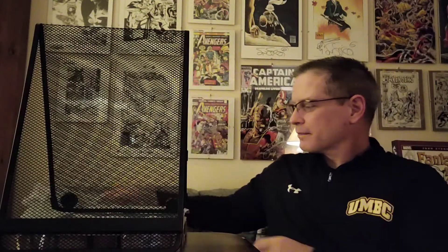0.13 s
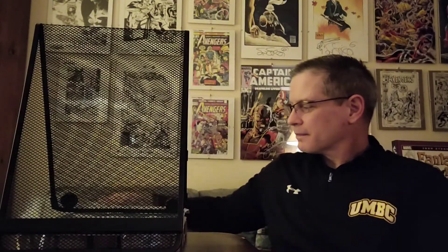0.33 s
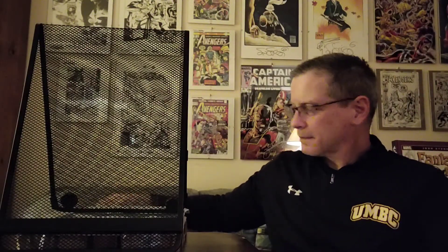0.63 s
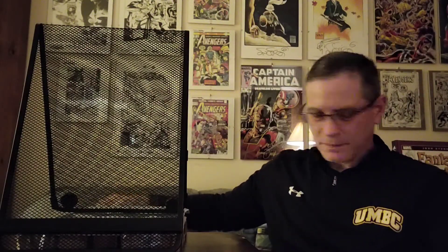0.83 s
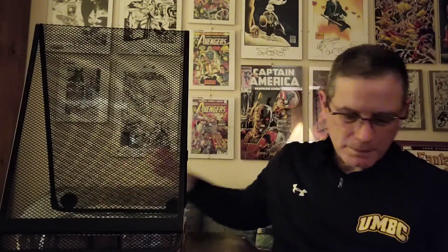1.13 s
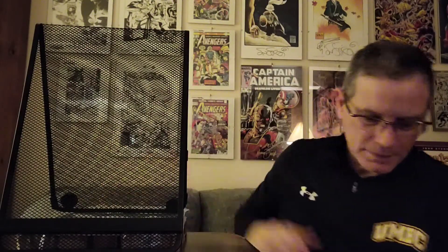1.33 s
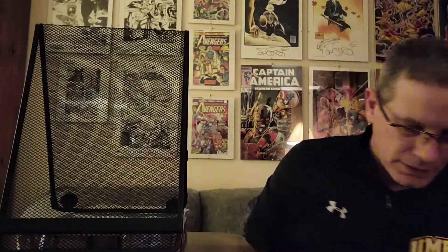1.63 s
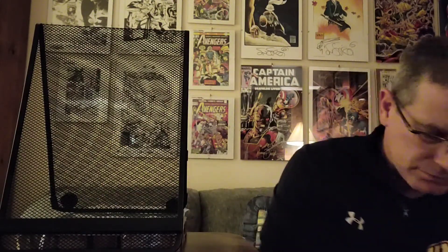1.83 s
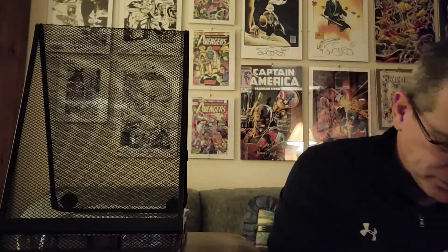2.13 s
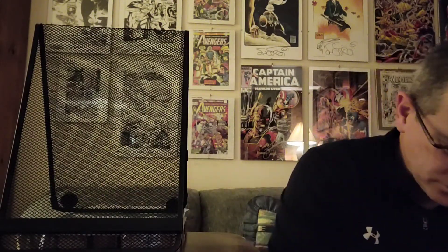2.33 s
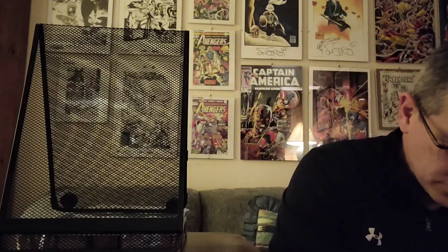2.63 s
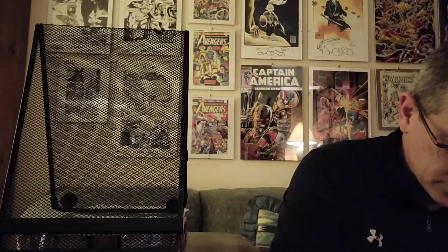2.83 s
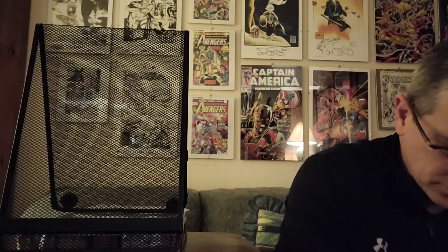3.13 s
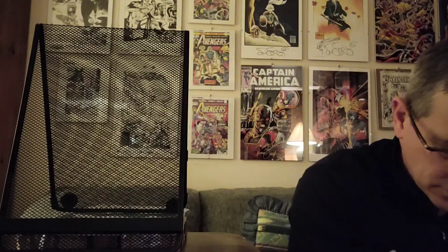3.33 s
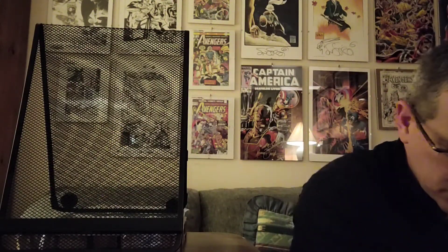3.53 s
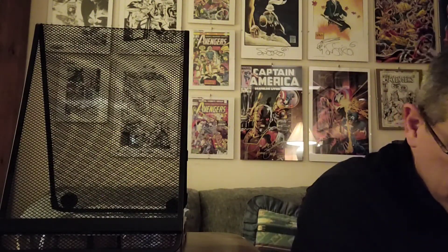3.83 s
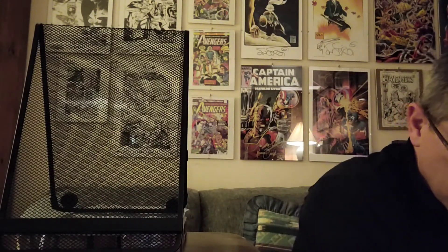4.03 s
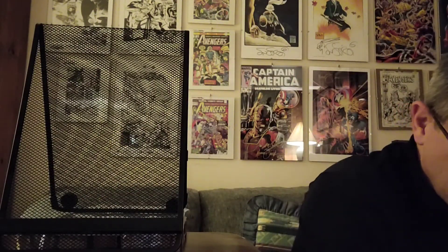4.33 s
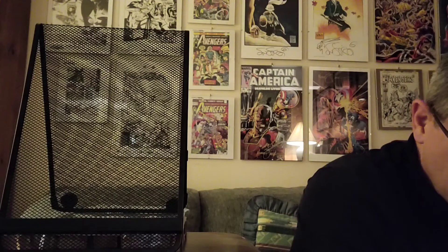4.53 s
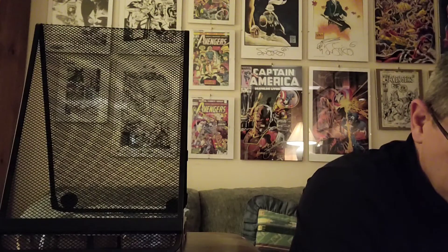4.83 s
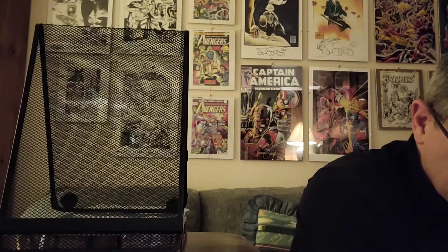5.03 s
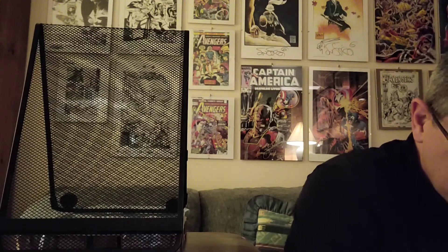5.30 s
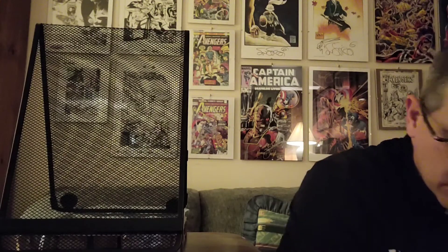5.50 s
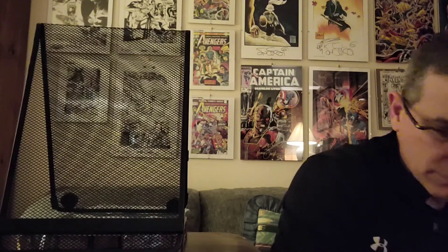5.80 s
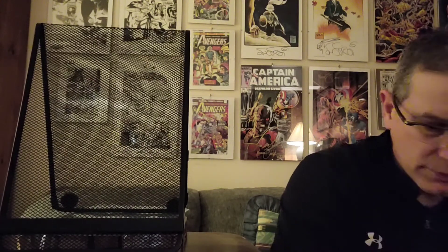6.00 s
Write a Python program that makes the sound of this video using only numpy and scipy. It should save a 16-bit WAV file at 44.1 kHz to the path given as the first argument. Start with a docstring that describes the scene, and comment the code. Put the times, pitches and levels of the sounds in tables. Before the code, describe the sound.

Faint taps and plastic clacks, dry crinkling and rummaging in wrap with dull box thumps, ending in a loud knocking scrape and two clacks.

```python
"""Faint dull taps lead to a few clacks, bursts of contacts, as someone sets a hard plastic case down.
A hand then digs in packing for the next: random slips hiss and crinkle, creases snap as short ticks.
Struck modes give knocks, edge clicks and thumps of the box; then a case scrapes loudly on its way out
and clacks twice. Filtered noise and a thin whine lie beneath, in a small furnished room, almost mono."""
import sys
import numpy as np
from scipy import signal
from scipy.fft import rfft, irfft
from scipy.io import wavfile
from scipy.ndimage import uniform_filter1d

SR = 44100
rng = np.random.default_rng(int(sys.argv[2]) if len(sys.argv) > 2 else 0)


def wav_record(signal):
    """Record a signal, one row per channel, as 16-bit PCM in the file named by sys.argv[1]."""
    frames = np.transpose(np.atleast_2d(signal))
    bounded = np.clip(frames, -1, 1)
    # unit amplitude maps onto the largest positive 16-bit level
    quanta = np.round(bounded * 32767).astype(np.int16)
    wavfile.write(sys.argv[1], SR, quanta)


N = 271656
TIME = np.arange(N) / SR

# spectrum of the quiet room: (frequency [Hz], relative density [dB per Hz])
AIR_COLOUR = [(25, -10.5), (60, 1.5), (200, -0.5), (600, -7), (900, -7), (1600, -13), (3000, -18),
              (6000, -13), (9000, -20.5), (16000, -25)]
# pitch of a faint electrical whine: (time [s], frequency [Hz])
WHINE_PITCH = [(0, 5570), (1, 5570), (2, 5570), (6.2, 5700)]
# decay of the room: (frequency [Hz], t60 [s])
ROOM_DECAY = [(100, 0.46), (600, 0.22), (3000, 0.25), (8000, 0.25), (15000, 0.16)]
# faint dull taps at a steady pace before the case is set down: (time [s], level [dB])
FAINT_TAPS = [(.055, -71), (.145, -73), (.235, -71), (.325, -72), (.412, -70)]
# a case clacks on its support:
# (time [s], level [dB], length of the chatter [s], treble tilt [dB per octave])
CASE_CLACKS = [(0.461, -46, 0.04, -2.5), (0.6857, -27, 0.038, 0), (0.9741, -30.5, 0.047, -0.5),
               (6.007, -28, 0.0046, -0.5), (6.049, -34, 0.0055, 0.5)]
# spectrum of a clack before its tilt: (frequency [Hz], relative density [dB per Hz])
CLACK_SPECTRUM = [(59, -27), (100, -26), (279, -21), (375, -9), (524, -11), (646, -5.5), (780, 1.5),
                  (962, -7.5), (1140, -4), (1210, -3), (1290, -7), (1460, -9), (7050, -17), (15000, -51)]
# dull knocks on a case: (time [s], level [dB], pitch [factor], ring [factor])
CASE_KNOCKS = [(.767, -34.5, 0.92, 0.42), (1.248, -27.5, 0.96, 1.1), (4.642, -35, 1.1, 0.2),
               (4.882, -40, 0.87, 1.6), (5.209, -37, 0.79, 0.33), (5.3515, -14, 0.71, 0.72),
               (5.359, -16.5, .8, 1.1), (5.4995, -9.5, 1.01, 1.5), (5.591, -12.5, 0.73, 1.6),
               (5.7755, -30.5, 1.15, 0.34)]
# modes of the case, before those factors: (frequency [Hz], relative level [dB], t60 [s])
CASE_MODES = [(376.6, -2.5, 0.062), (516.4, -10.5, 0.17), (613, -8, 0.11), (673, -7, 0.06),
              (790, -0.5, 0.098), (843, -17, 0.0327), (992, -18.5, 0.058), (1092, 1.5, 0.017),
              (1236, -11.5, 0.057), (1653, -14, 0.047), (2310, -28, 0.036)]
# bumps against the box: (time [s], level [dB], pitch [factor], ring [factor])
BOX_THUMPS = [(2.3332, -29.5, 3.04, 0.15), (2.34, -22, 1.08, 0.97), (3.308, -31.5, 1.07, 1),
              (3.7995, -13, 0.942, 0.69), (3.819, -18.5, 1.1, 0.72), (3.846, -33, 1, 1.3)]
# modes of the box, before those factors: (frequency [Hz], relative level [dB], t60 [s])
BOX_MODES = [(71.8, -6.5, 0.33), (119, -2, 0.086), (167, 1, 0.064), (268.4, 7.5, 0.086), (340, -1, 0.068),
             (455, 2.5, 0.043), (525, -0.5, 0.063), (670, 7, 0.022), (1045, 5, 0.016), (1480, -37.5, 0.034),
             (1800, -43, 0.041)]
# hard edges of two cases click together: (time [s], level [dB], pitch [factor], ring [factor])
EDGE_CLICKS = [(1.1, -40, 1.35, 0.47), (1.3375, -45.5, 0.94, 0.48), (3.6416, -22, 1.06, 0.65),
               (4.2303, -41, 0.57, 0.75), (5.4617, -22.5, 0.93, 1.2), (5.775, -42.5, 0.84, 1)]
# modes of a case's edge, before those factors: (frequency [Hz], relative level [dB], t60 [s])
EDGE_MODES = [(970, -1.5, 0.01), (1380, -6.5, 0.039), (2450, -1.5, 0.028), (2940, 0.5, 0.02),
              (3580, -5.5, 0.046), (4960, -1, 0.0059), (7840, -10.5, 0.0215)]
# the loudest creases snapping over: (time [s], level [dB], centre of the spectrum [Hz])
CREASE_SNAPS = [(1.131, -42, 7500), (1.1455, -46, 8000), (1.4707, -47.5, 3500), (1.9012, -40, 4850),
                (1.943, -39.5, 4400), (2.014, -34.5, 5770), (2.0444, -36, 4500), (2.0598, -32.5, 5030),
                (2.1383, -39, 5870), (2.1951, -38, 6000), (2.3194, -33.5, 5730), (2.333, -33.5, 3100),
                (2.3807, -41.5, 6000), (2.6433, -35, 7640), (2.7286, -36.5, 5700), (2.9892, -35.5, 3900),
                (3.572, -29.5, 6400), (3.765, -34, 3970), (4.2, -32.5, 6850), (4.2976, -38.5, 3560),
                (4.3135, -40, 4130), (4.4002, -34.5, 5170), (4.4714, -34.5, 4400), (4.5526, -33, 4850),
                (4.7481, -33, 3600), (4.8965, -46, 9000), (5.0599, -44, 5100), (5.319, -27.5, 5640),
                (5.3297, -31, 5740), (5.4277, -21.5, 4430), (5.8065, -37, 5670)]
# spectra of flexing box, rubbed cases and crinkling wrap: (frequency [Hz], relative density [dB per Hz])
FLEX_COLOUR = [(30, -29.5), (50, 0), (75, 2), (100, -3.5), (150, -1.5), (200, -1.5), (275, 6.5),
               (340, -5.5), (450, -40), (800, -55)]
RUB_COLOUR = [(170, -17.5), (300, -21.5), (390, -2.5), (480, 0), (650, 4), (930, 3), (1100, -0.5),
              (1500, 1), (2200, -4), (3000, -10.5), (4500, -19), (7000, -36)]
CRINKLE_COLOUR = [(1100, -39), (1700, -6.5), (2300, -3), (2900, -3.5), (4400, -2), (6500, 0.5), (7800, -1),
                  (10000, -11.5), (13000, -18), (16000, -29)]
# strokes of the hand through the packing, each pressing fully from its time on; levels are relative:
# (time [s], rise [s], hold [s], fall [s], flexing of the box [dB], rubbing of the cases [dB],
#  crinkle of the wrap [dB], lift of the upper treble [dB])
HAND_STROKES = [(0.053, 0.07, 0.077, 0.023, -81, -70.5, -84, -9),
                (1.115, 0.035, 0.017, 0.061, -65.5, -51, -52, 0),
                (1.247, .1, 0.022, 0.091, -51, -36, -42, -7),
                (1.539, 0.048, 0.042, 0.065, -60, -50.5, -44, -8.5),
                (1.73, 0.04, 0.054, 0.09, -73, -62.5, -50.5, -6),
                (1.892, 0.013, 0.22, 0.088, -60.5, -47, -48, -7),
                (2.046, 0.024, 0.028, .08, -42.5, -38.5, -36, -6),
                (2.196, .05, 0.009, 0.063, -52.5, -46.5, -42.5, 1),
                (2.324, 0.041, 0.051, .09, -54, -43.5, -45.5, -1),
                (2.485, 0.063, 0.032, 0.092, -43, -41, -42.5, -7.5),
                (2.736, 0.15, .08, .08, -54.5, -46.5, -41.5, -2),
                (2.865, .12, 0.059, 0.089, -57.5, -41, -32.5, 1),
                (3.066, 0.16, 0.069, 0.074, -49.5, -42.5, -39, -0.5),
                (3.164, 0.0064, 0.1, .08, -34.5, -32, -30.5, -7),
                (3.22, 0.061, .05, 0.082, -40, -30.5, -24.5, 10),
                (3.336, 0.14, 0.088, 0.12, -40, -36, -25, 0), (3.52, 0.31, .14, .16, -55, -41, -29.5, -2.5),
                (3.798, .08, .03, 0.094, -39, -35, -34.5, -4),
                (3.875, .06, 0.11, 0.029, -50, -39.5, -34, -6),
                (4.197, .004, 0.0069, .012, -70, -60, -34.5, 17),
                (4.242, 0.086, 0.11, .06, -55.5, -45, -46.5, -11),
                (4.439, 0.15, 0.055, .1, -51, -43, -40, -6),
                (4.551, 0.059, 0.022, 0.12, -47.5, -40.5, -39, -3),
                (4.758, 0.063, 0.023, .05, -54.5, -39.5, -35, -7),
                (4.885, 0.21, 0.019, 0.087, -50, -47.5, -47, -7),
                (5.08, 0.12, 0.086, .08, -75.5, -58, -53, 4),
                (5.213, 0.069, 0.021, 0.29, -54, -38.5, -37, -5.5),
                (5.364, .03, 0.085, .08, -31, -23, -28, -7.5),
                (5.47, 0.02, 0.051, 0.088, -30.5, -16.5, -23.5, -11),
                (5.522, 0.021, 0.019, 0.049, -31, -14.5, -16.5, -8),
                (5.576, 0.019, 0.023, 0.057, -19.5, -11.5, -16, -4),
                (5.666, 0.049, 0.028, 0.12, -33, -28.5, -38.5, -8),
                (5.776, .08, 0.035, 0.058, -42, -37, -41, -5),
                (5.886, 0.023, .005, .045, -55, -41, -47, -13.5),
                (6.002, .015, 0.051, 0.057, -41.5, -53, -53, -13)]
SWING_DB = 19.5  # a stroke swells by this much over its rise, and dies by as much over its fall
SAG_DB_PER_S = 14  # it eases while it is held
# light stirring from this time on: relative (flexing, rubbing, crinkle); lift of the upper treble
REACH_S, STIR_DB, STIR_LIFT_DB = 1.05, (-69.5, -62, -60), -9.5
EDGE_HZ = 15950  # upper band limit


def amp(db):
    """The amplitude ratio is ten to the power of decibels over twenty."""
    return 10 ** (np.asarray(db) / 20)


def unit(x):
    """Division by the root mean square gives a signal of rms 1."""
    return x / np.sqrt(np.mean(x ** 2) + 1e-20)


def at_level(x, db, span):
    """A transient is rated by its energy: spread over span seconds, it has the level db."""
    return amp(db) * x * np.sqrt(span * SR / (np.sum(x ** 2) + 1e-20))


def lookup(points, hz):
    """Hearing spaces pitch by ratio, so tables are interpolated on a log-frequency axis."""
    f, value = np.transpose(points)
    return np.interp(np.log(hz + 1), np.log(f + 1), value)


def add(mix, s, sound):
    """Superposition: a sound starting at s seconds is summed into the mix."""
    part = mix[max(round(s * SR), 0):][:len(sound)]
    part += sound[:len(part)]


def colour(x, db_at, size=4096):
    """Minimum phase: the Hilbert transform of the log gain db_at(Hz) gives a causal filter."""
    hz = abs(np.fft.fftfreq(size, 1 / SR)) + 1
    log_gain = np.log(amp(np.maximum(db_at(hz), -100)))
    spectrum = np.exp(np.conj(signal.hilbert(log_gain)))
    response = np.fft.ifft(spectrum).real[:size // 2]
    return signal.fftconvolve(x, response)[:len(x)]


def low_pass_db(hz, corner_hz, order):
    """The gain of a low-pass falls by a power law above its corner."""
    return -10 * np.log10(1 + (hz / corner_hz) ** order)


def drift(rate_hz):
    """Low-passed noise is a slow random motion, here of rms 1."""
    hz = np.fft.rfftfreq(N, 1 / SR)
    return unit(irfft(rfft(rng.standard_normal(N)) / (1 + (hz / rate_hz) ** 2), N))


def room(x, wet_db, size=20000):
    """Reverberation: direct sound plus reflections whose decay depends on frequency."""
    reflections = rng.choice([-1., 1.], size) * (rng.random(size) < .06)
    reflections = reflections * (np.arange(size) > .003 * SR)
    hz, t, z = signal.stft(reflections, SR, nperseg=256)
    decay = amp(-60 * t / lookup(ROOM_DECAY, hz)[:, None])
    tail = signal.istft(z * decay, SR)[1]
    reverberation = signal.fftconvolve(x, tail / np.linalg.norm(tail))[:N]
    wet = amp(wet_db)
    return (x + wet * reverberation) / np.sqrt(1 + wet ** 2)


def widen(x, side_db, treble_db):
    """Stereo width: a room-filtered copy enters the two channels with opposite signs."""
    shape = lambda hz: lookup([(1200, 0), (3000, treble_db)], hz)
    side = amp(side_db) * colour(room(x, wet_db=-9.5), shape)
    return np.array([x - side, x + side])


def high_pass(x, hz):
    """A second-order high-pass removes rumble below the body of a hit."""
    return signal.sosfilt(signal.butter(2, hz, "high", fs=SR, output="sos"), x)


def background(air_db=-77, whine_db=-86, octave_db=-7):
    """Broadband room air wavers in level beneath a thin tone with its second harmonic."""
    air = unit(colour(rng.standard_normal(N), lambda hz: lookup(AIR_COLOUR, hz)))
    air = air * amp(1.2 * drift(8.1))
    whine_hz = np.interp(TIME, *np.transpose(WHINE_PITCH)) + 3 * drift(44)
    angle = 2 * np.pi * np.cumsum(whine_hz) / SR
    whine = np.sin(angle) + amp(octave_db) * np.sin(2 * angle)
    return amp(air_db) * air + amp(whine_db) * whine


def taps(decay_s=0.0027, top_hz=550):
    """A short low-passed noise impulse is heard as a dull puff."""
    out, t = np.zeros(N), np.arange(2048) / SR
    for s, db in FAINT_TAPS:
        burst = rng.standard_normal(len(t)) * np.exp(-t / decay_s)
        puff = colour(burst, lambda hz: low_pass_db(hz, top_hz, 4))
        add(out, s, at_level(puff, db, 0.0085))
    return out


def blows(rows, modes, contact_s, scuff, scuff_s, scuff_hz):
    """Modal excitation: a blow rings a body's modes, with a dull scuff at the point of contact."""
    out, t = np.zeros(N), np.arange(SR // 3) / SR
    for s, db, pitch, ring in rows:
        body = np.zeros(len(t))
        for hz, gain, t60 in modes:
            envelope = amp(gain - 60 * t / (t60 * ring))
            body += rng.choice([-1, 1]) * envelope * np.sin(2 * np.pi * hz * pitch * t)
        rasp = colour(rng.standard_normal(len(t)), lambda hz: low_pass_db(hz, scuff_hz * pitch, 4))
        hit = body + scuff * unit(rasp) * np.exp(-t / scuff_s)
        hit = hit * (1 - np.exp(-t / contact_s))
        add(out, s, at_level(hit, db, 0.013))
    return out


def box_thumps():
    """A bump against the box excites its low, short-lived modes."""
    hits = blows(BOX_THUMPS, BOX_MODES, contact_s=0.00031, scuff=0.48, scuff_s=0.011, scuff_hz=1500)
    return high_pass(hits, hz=87.5)


def case_knocks():
    """A softer contact onsets more slowly, so the case's modes sound as a dull knock."""
    hits = blows(CASE_KNOCKS, CASE_MODES, contact_s=0.0018, scuff=0.35, scuff_s=0.0099, scuff_hz=1320)
    return high_pass(hits, hz=295)


def edge_clicks():
    """Hard edges meet in a very brief contact, which excites high modes."""
    return blows(EDGE_CLICKS, EDGE_MODES, contact_s=0.00021, scuff=0.66, scuff_s=0.0011, scuff_hz=6970)


def clacks(rise_s=0.0014, fall_s=0.0037, sag_s=0.058):
    """Repeated impact: a loose case chatters in a quick burst of contacts, then settles."""
    out, t = np.zeros(N), np.arange(SR // 5) / SR
    for s, db, length, tilt_db in CASE_CLACKS:
        contacts = rng.standard_normal(len(t)) * (rng.random(len(t)) < .15)
        settling = np.exp(-t / sag_s - np.maximum(t - length, 0) / fall_s)
        burst = contacts * (1 - np.exp(-t / rise_s)) * settling
        shape = lambda hz: lookup(CLACK_SPECTRUM, hz) + tilt_db * np.log2(hz / 1000)
        add(out, s, at_level(colour(burst, shape), db, 0.49 * length + 0.0056))
    return out


def snaps(narrow_db=4, top_hz=8800):
    """Buckling: each crease lets go with a sharp tick and a short shiver of the sheet."""
    out, t = np.zeros(N), np.arange(2048) / SR
    decay = np.exp(-t / .0007) + amp(-21) * np.exp(-t / .008)
    for s, db, centre in CREASE_SNAPS:
        tick = rng.standard_normal(len(t)) * decay
        band_db = lambda hz: -np.minimum(narrow_db * np.log2(hz / centre) ** 2, 30)
        shape = lambda hz: band_db(hz) + low_pass_db(hz, top_hz, 8)
        add(out, s, at_level(colour(tick, shape), db, 0.0064))
    return out


def crackle(level_db, size_db=-9, ceiling_db=-41):
    """Random impulses: small creases pop one by one, bright and dry, above the hiss of the wrap."""
    pops = rng.standard_normal(N) * (rng.random(N) < 70 / SR)  # about 70 per second
    shiver = rng.standard_normal(128) * np.exp(-np.arange(128) / (.0005 * SR))
    spectrum = [(900, -29), (2300, 12.5), (7000, 18.5), (10500, -9), (16000, -23)]
    pops = colour(signal.fftconvolve(pops, shiver)[:N], lambda hz: lookup(spectrum, hz))
    return amp(size_db + np.minimum(level_db, ceiling_db)) * unit(pops)


def case_ring(rub_db, clumps, ring_db=-6):
    """Forced vibration: pressed hard, a rubbed case sings with its modes; a light touch hardly wakes them."""
    grip_db = np.interp(rub_db, [-50, -25, -12], [-7, -3, 2])
    drive = rng.standard_normal(N) * amp(2 * clumps + rub_db + grip_db)
    t = np.arange(SR // 4) / SR
    response = np.zeros(len(t))
    for k, (hz, gain, t60) in enumerate(CASE_MODES):
        response += (-1) ** k * amp(gain - 60 * t / t60) * np.sin(2 * np.pi * hz * t)
    # a fixed tone balance: low and middle modes weaker, those near 1100 Hz stronger
    balance = [(120, -11.5), (370, 0), (580, -5.5), (790, -5.0), (1100, 4.0)]
    response = colour(response, lambda hz: lookup(balance, hz))
    return amp(ring_db) * signal.fftconvolve(drive, response / np.linalg.norm(response))[:N]


def wander(x, depth_db, size=512):
    """As the sheet bends, narrow resonances come and go."""
    z = signal.stft(x, SR, nperseg=size, noverlap=size * 3 // 4)[2]
    patches = uniform_filter1d(rng.standard_normal(z.shape), size=3, axis=0)
    patches = uniform_filter1d(patches, size=16, axis=1)
    z = z * amp(depth_db * unit(patches))
    return signal.istft(z, SR, nperseg=size, noverlap=size * 3 // 4)[1][:N]


def friction(level_db, spectrum, clumps, per_s, clump_db, wander_db):
    """Stick-slip: uneven slips come in clumps; a light brush and a hard rub both merge into a hiss."""
    # per_s is the rate of slips at a level of -45 dB
    chance = np.minimum(per_s * amp(.8 * (level_db + 45)) / SR, 1)
    sizes = amp(3.4 * np.minimum(rng.exponential(1, N), 4)) * rng.choice([-1., 1.], N)
    slips = unit(sizes) * (rng.random(N) < chance) / np.sqrt(chance)
    merged = np.interp(level_db, [-62, -45, -30], [.8, .28, .62])  # share of hiss in the power
    drive = np.sqrt(1 - merged) * slips + np.sqrt(merged) * rng.standard_normal(N)
    # clumping grows shallower as the level rises
    drive = drive * amp(clump_db * clumps / (1 + amp(level_db + 26)))
    coloured = colour(drive, lambda hz: lookup(spectrum, hz))
    return amp(level_db) * unit(wander(coloured, wander_db))


def handling():
    """Powers add: strokes swell, hold and release over a light stirring; gives three levels and the lift in dB."""
    power = amp(np.array(STIR_DB)[:, None]) ** 2 * (TIME > REACH_S) + 1e-12
    lift = STIR_LIFT_DB * power[2]
    for s, rise, hold, fall, flex_db, rub_db, crinkle_db, lift_db in HAND_STROKES:
        t = TIME - s
        shape_db = SWING_DB * (np.minimum(t, 0) / rise - np.maximum(t - hold, 0) / fall)
        shape_db = shape_db - SAG_DB_PER_S * np.clip(t, 0, hold)
        envelope = amp(np.maximum(shape_db, -150))
        stroke = np.outer(amp([flex_db, rub_db, crinkle_db]), envelope) ** 2
        power = power + stroke
        lift = lift + lift_db * stroke[2]  # weighted by the power of the crinkle
    return *(10 * np.log10(power)), lift / power[2]


def packing(hinge_hz=4800):
    """Common excitation: strokes and clumps shared by flexing box, rubbed cases and crinkling wrap."""
    flex_db, rub_db, crinkle_db, lift_db = handling()
    clumps = drift(46)
    flex = friction(flex_db, FLEX_COLOUR, clumps, per_s=670, clump_db=2.5, wander_db=3.0)
    rub = friction(rub_db, RUB_COLOUR, clumps, per_s=900, clump_db=2.5, wander_db=4.0)
    crinkle = friction(crinkle_db, CRINKLE_COLOUR, clumps, per_s=1800, clump_db=1.5, wander_db=1.6)
    # each stroke's lift brightens or darkens the crinkle about the hinge frequency
    hz = np.fft.rfftfreq(N, 1 / SR) + 1
    treble = irfft(rfft(crinkle) / (1 + (hinge_hz / hz) ** 4), N)
    lift = amp(lift_db / 2)
    crinkle = lift * treble + (crinkle - treble) / lift
    hiss = amp(-2.5) * flex + amp(-2.5) * rub + amp(-1.5) * crinkle
    return hiss + case_ring(rub_db, clumps) + crackle(crinkle_db)


def scene():
    """Direct-to-reverberant ratio sets distance: near packing and box, farther cases, still air."""
    air = widen(background(), side_db=2, treble_db=-6)
    box = widen(room(box_thumps(), wet_db=-19.5), side_db=-27.5, treble_db=-12)
    knocks = widen(room(case_knocks(), wet_db=-11), side_db=-27, treble_db=-10)
    chatter = widen(room(clacks(), wet_db=-9.0), side_db=-19.5, treble_db=-7)
    ticks = widen(room(snaps() + edge_clicks(), wet_db=-11.5), side_db=-32.5, treble_db=-3.5)
    wrap = widen(room(packing(), wet_db=-16.5), side_db=-52.5, treble_db=-23)
    return air + taps() + box + knocks + chatter + ticks + wrap


def record(dry):
    """Saturation rounds peaks off near full scale; a linear-phase low-pass then limits the band."""
    held = dry / (1 + dry ** 6) ** (1 / 6)
    band_limit = signal.firwin(511, EDGE_HZ, window=("kaiser", 9), fs=SR)
    return signal.oaconvolve(held, band_limit[None], "same")


dry = scene()
out = record(dry)
wav_record(out)
```